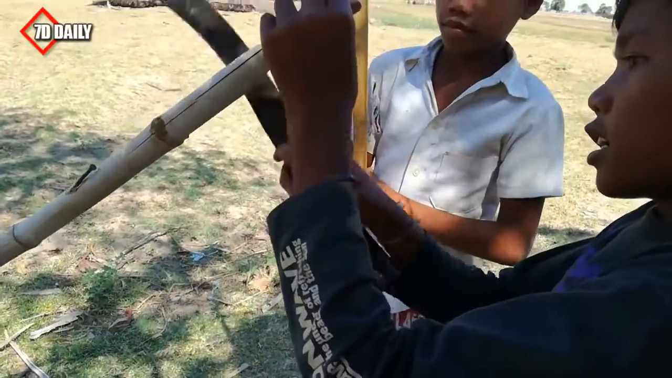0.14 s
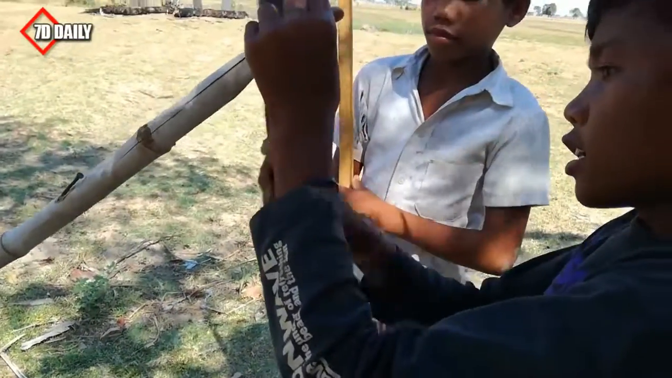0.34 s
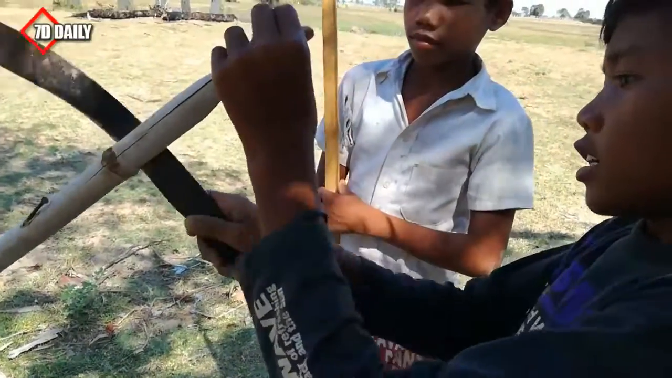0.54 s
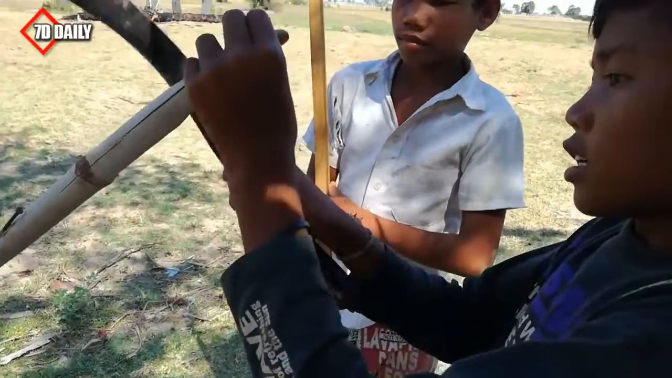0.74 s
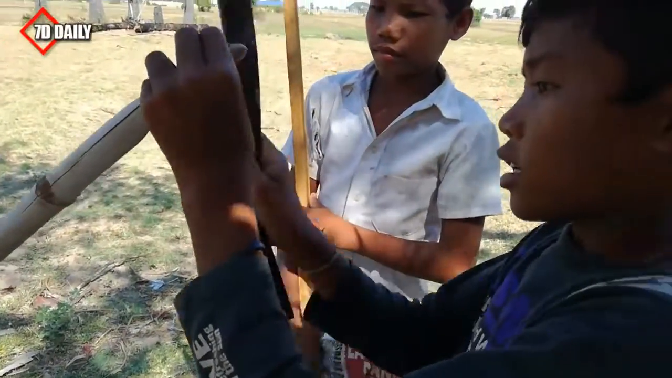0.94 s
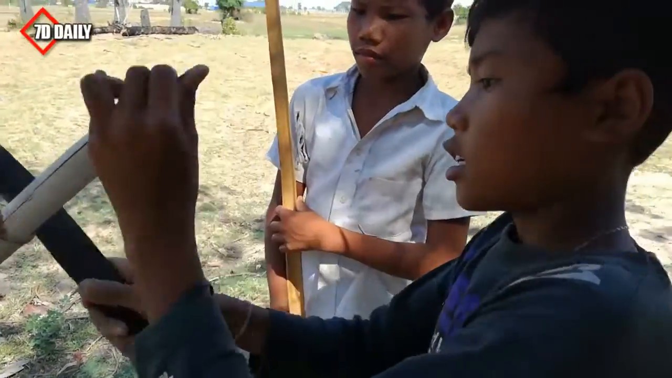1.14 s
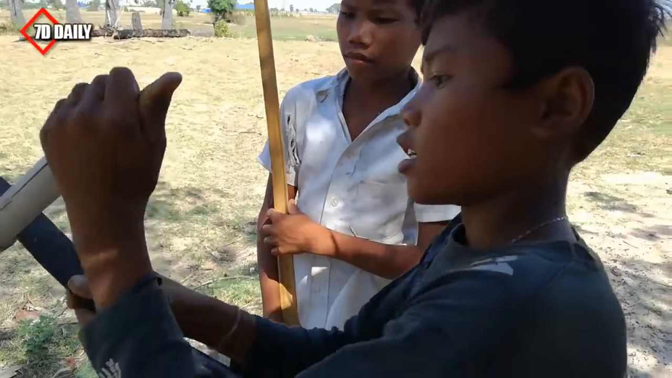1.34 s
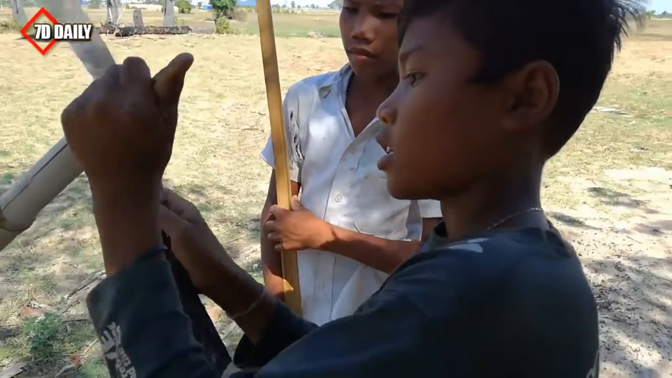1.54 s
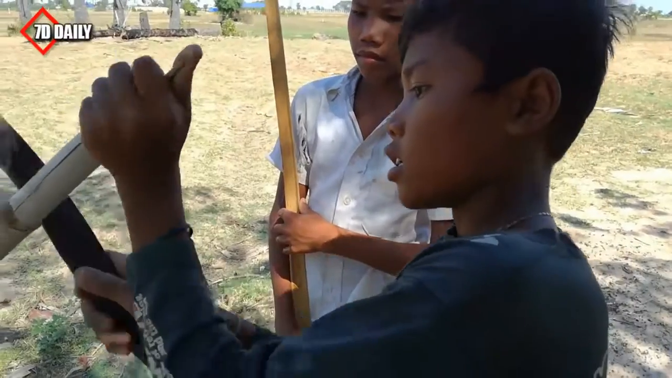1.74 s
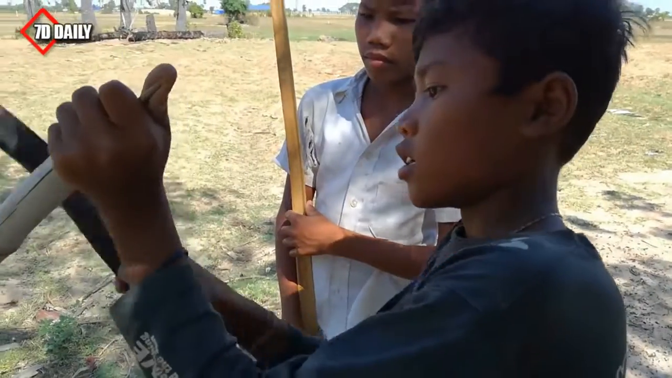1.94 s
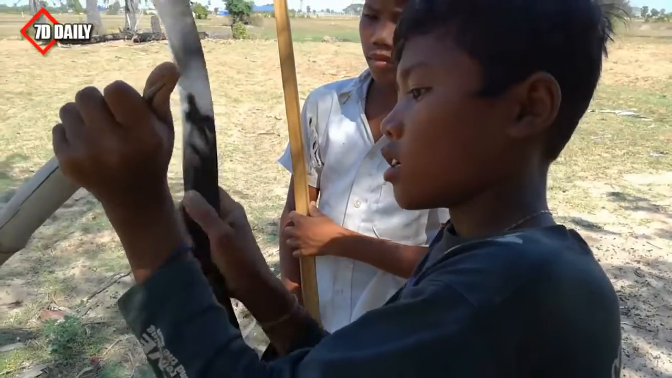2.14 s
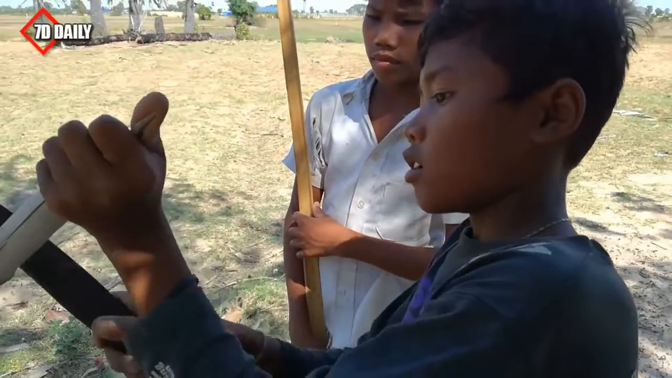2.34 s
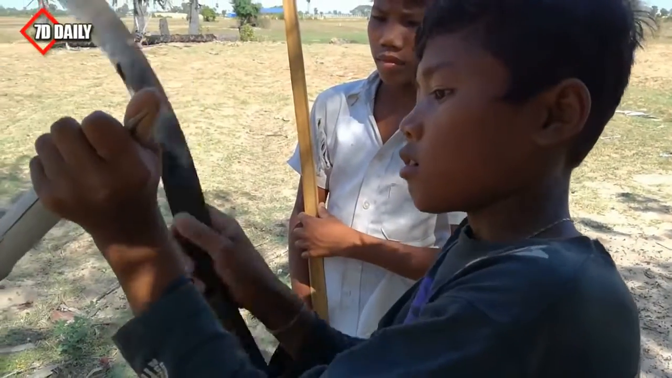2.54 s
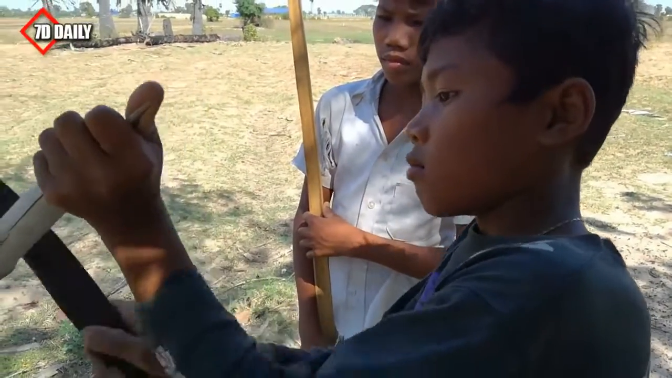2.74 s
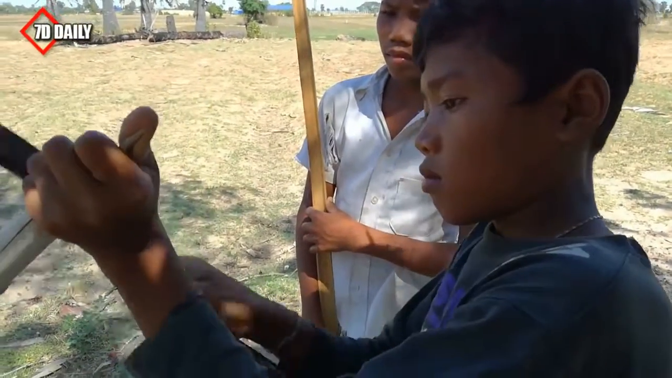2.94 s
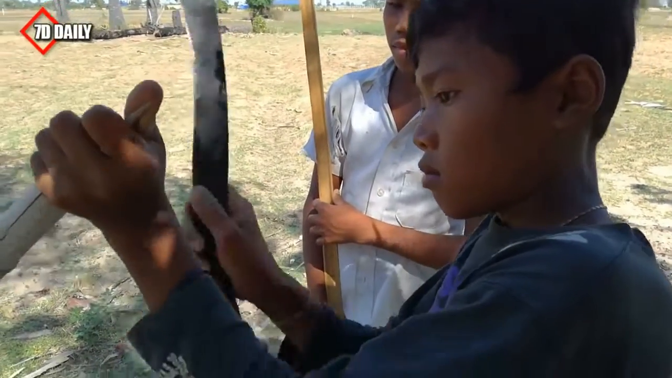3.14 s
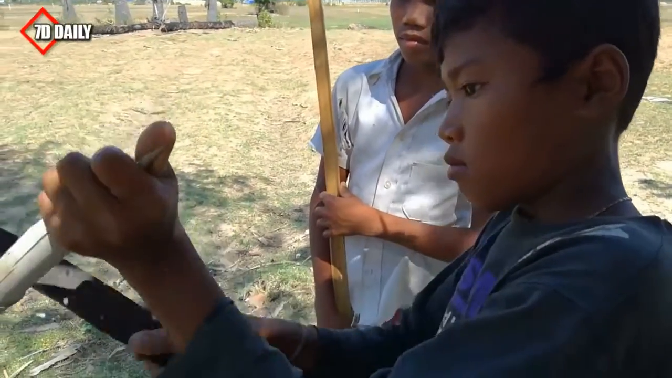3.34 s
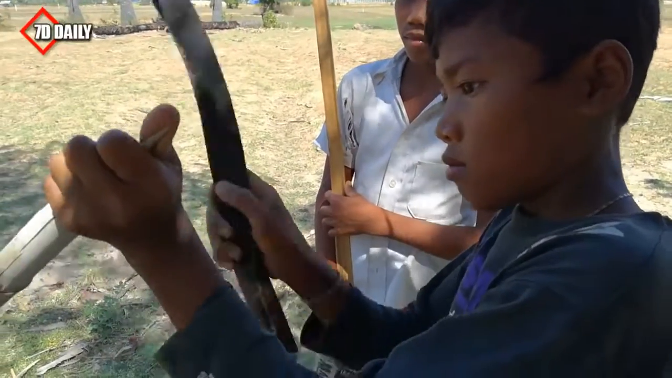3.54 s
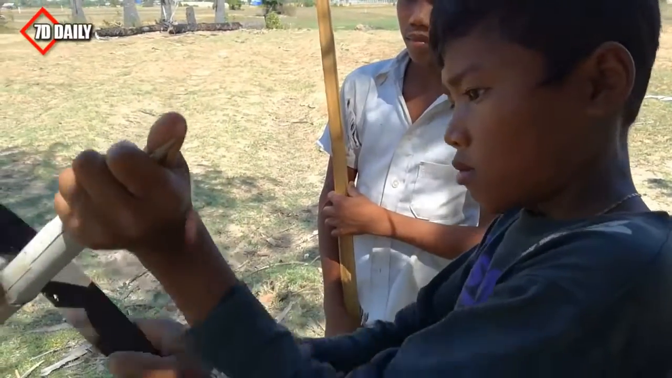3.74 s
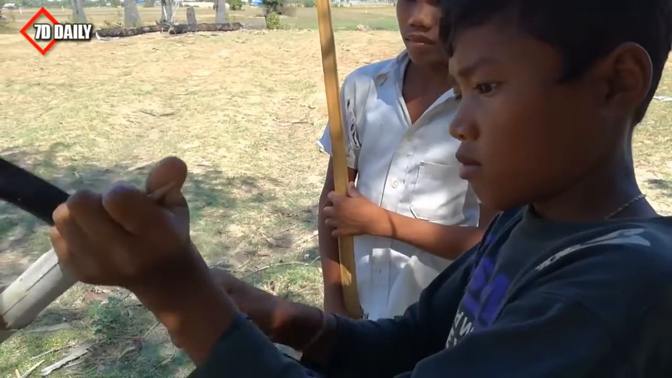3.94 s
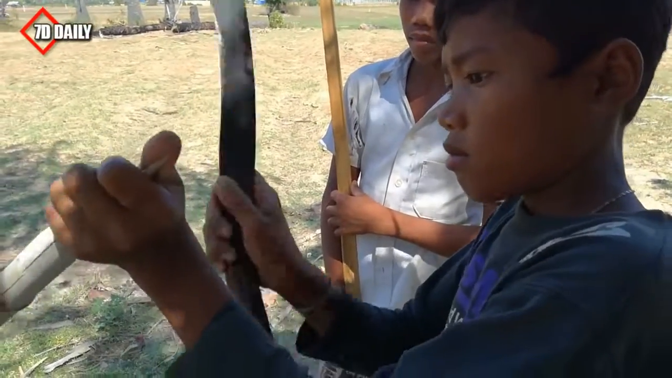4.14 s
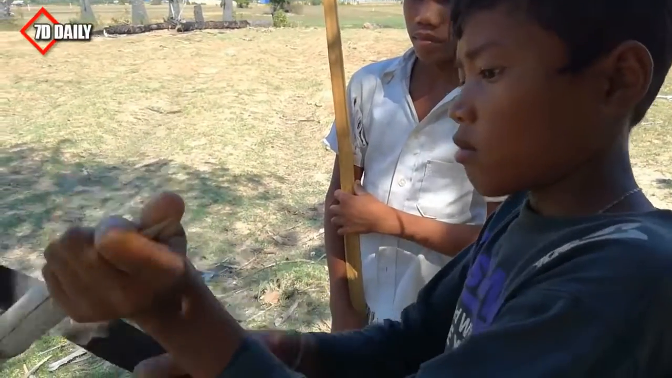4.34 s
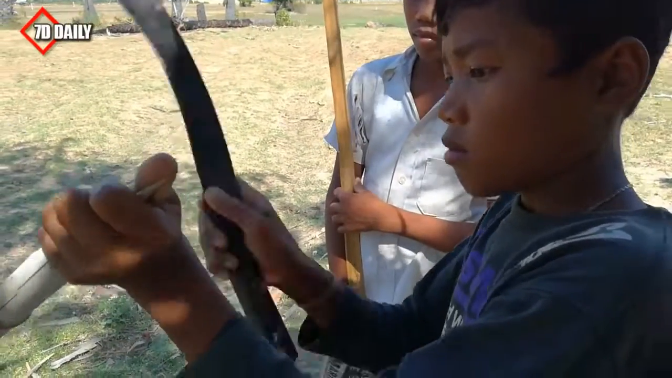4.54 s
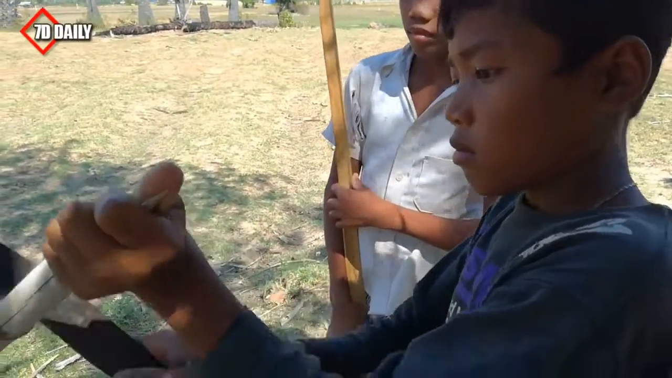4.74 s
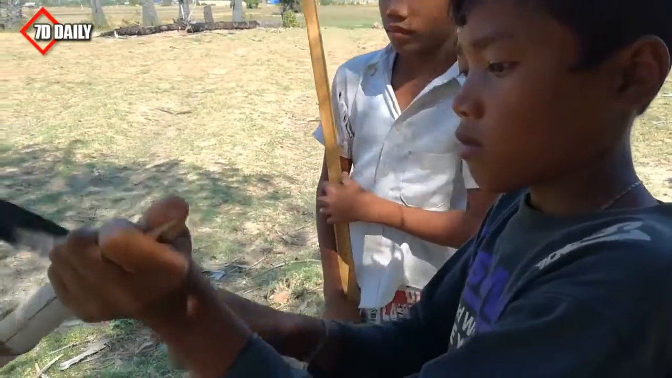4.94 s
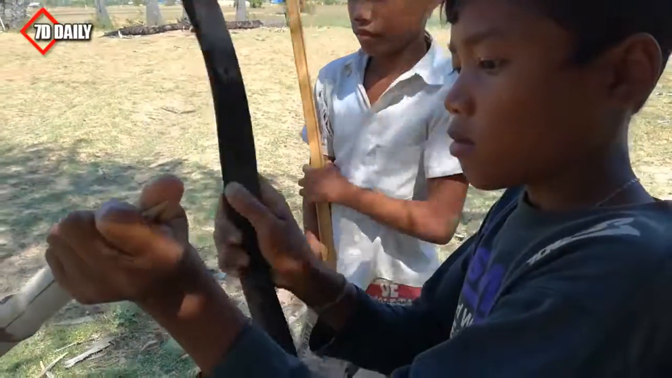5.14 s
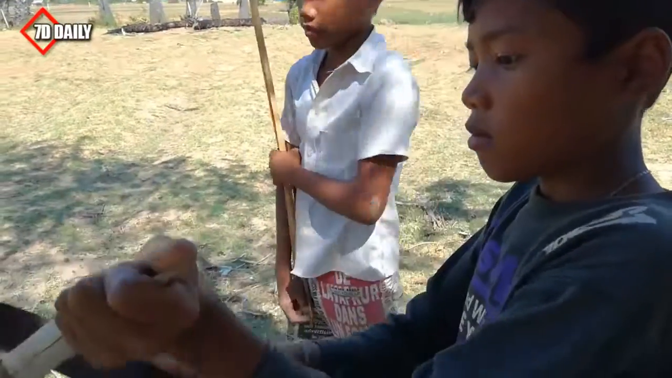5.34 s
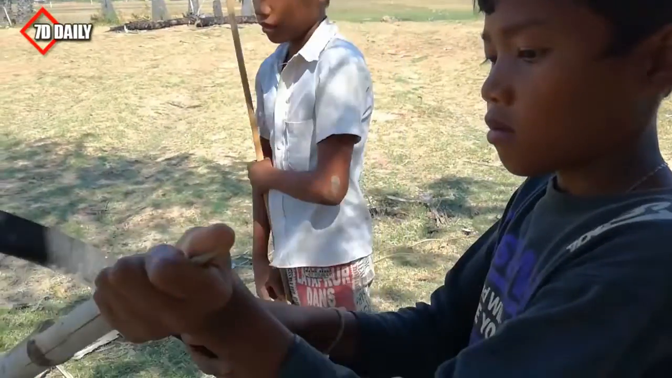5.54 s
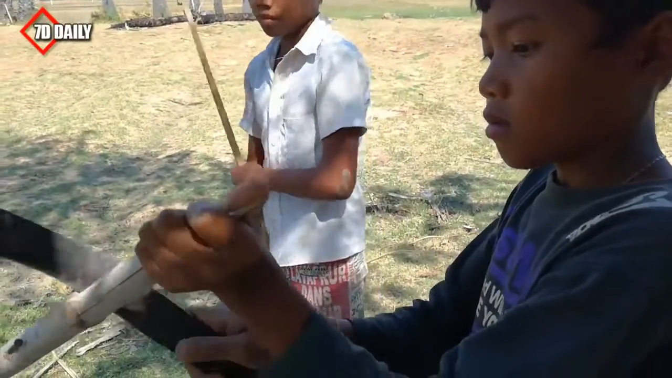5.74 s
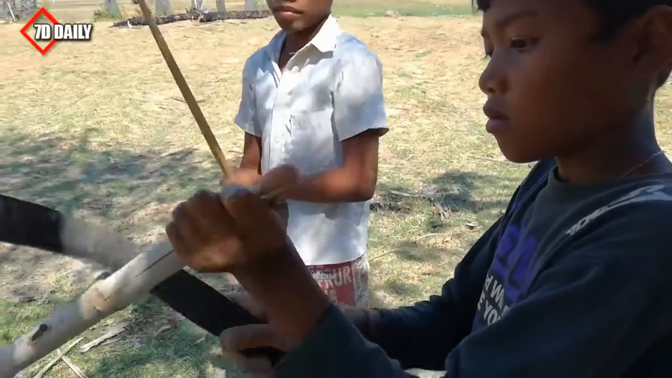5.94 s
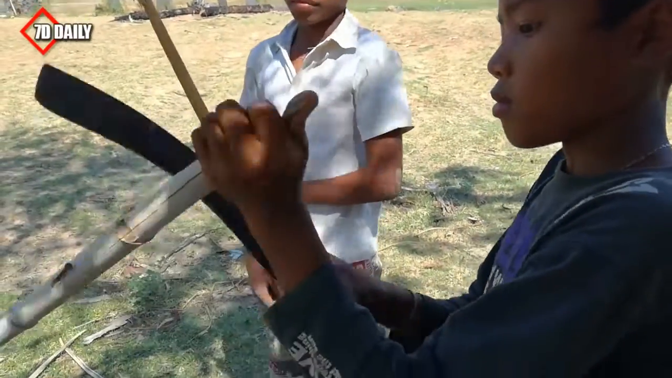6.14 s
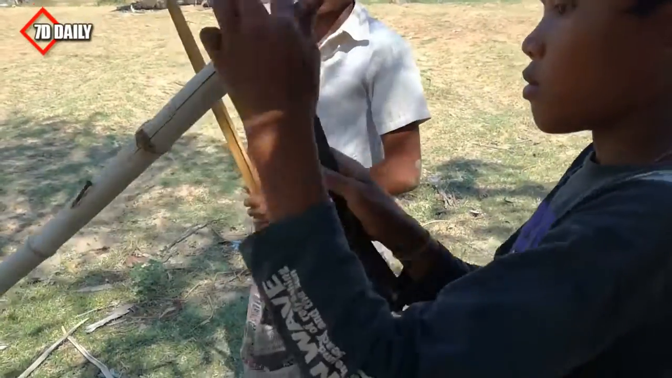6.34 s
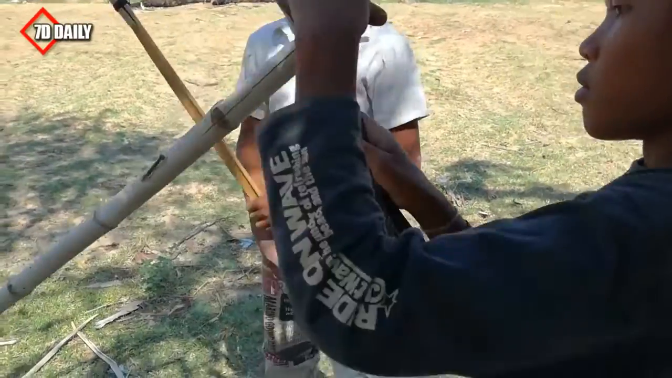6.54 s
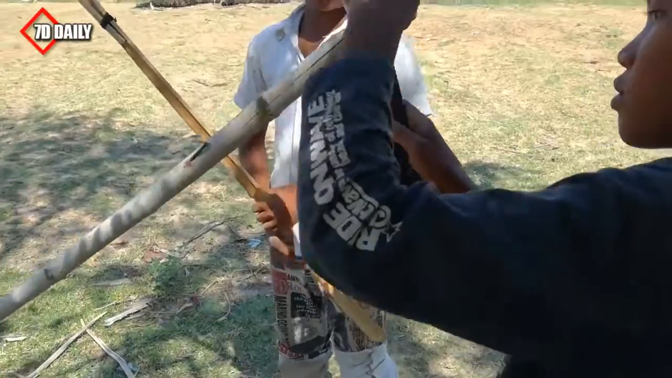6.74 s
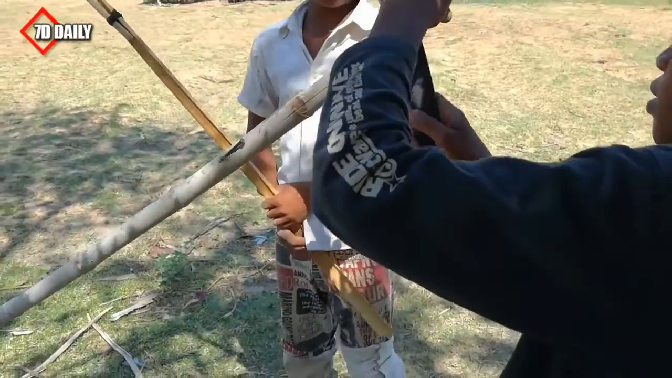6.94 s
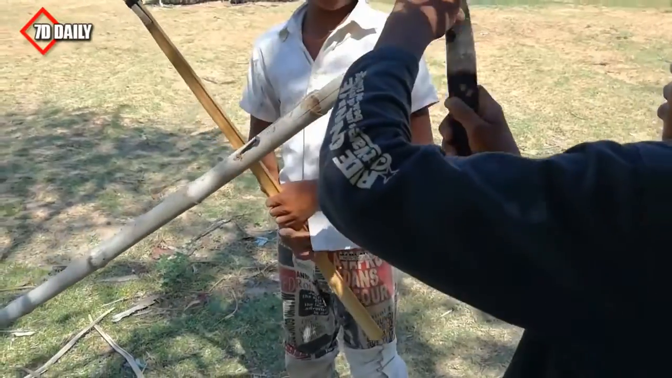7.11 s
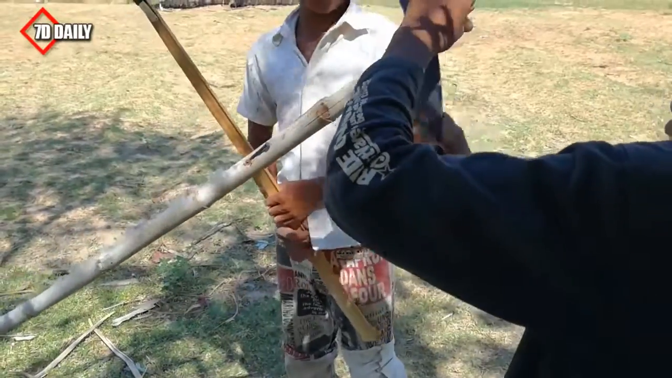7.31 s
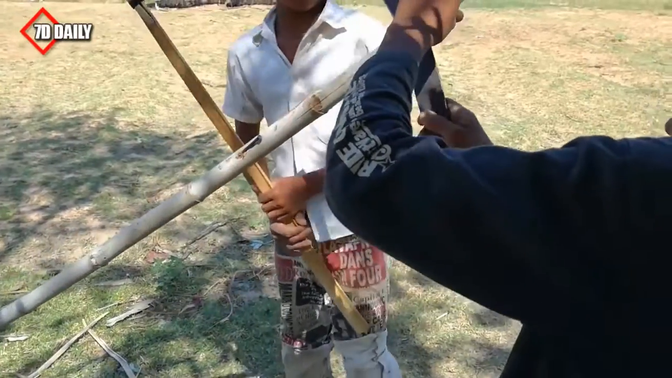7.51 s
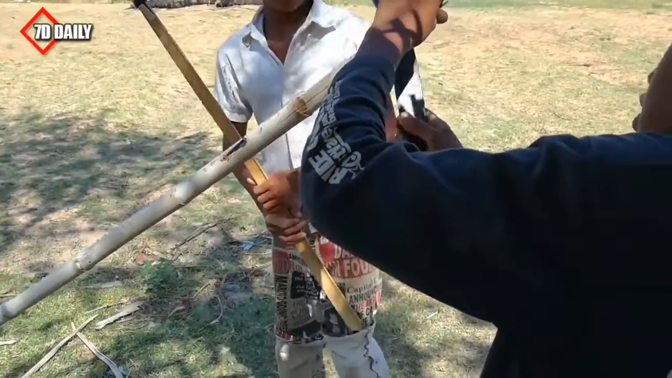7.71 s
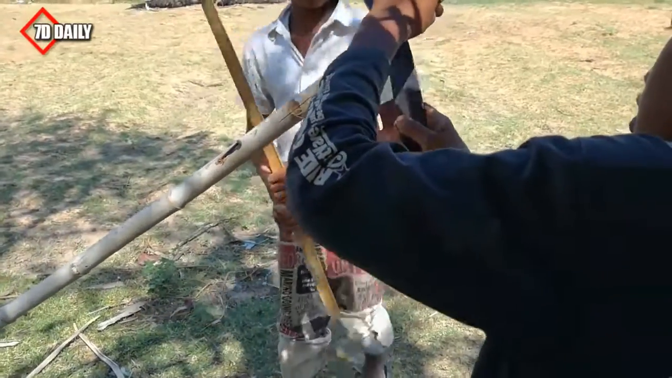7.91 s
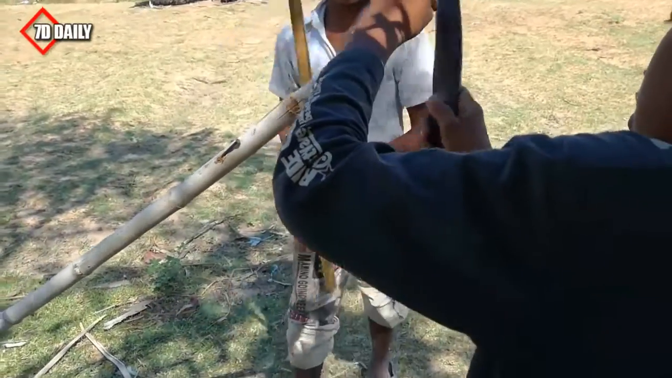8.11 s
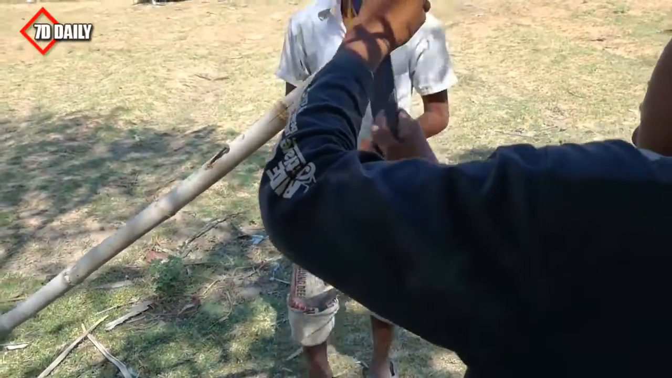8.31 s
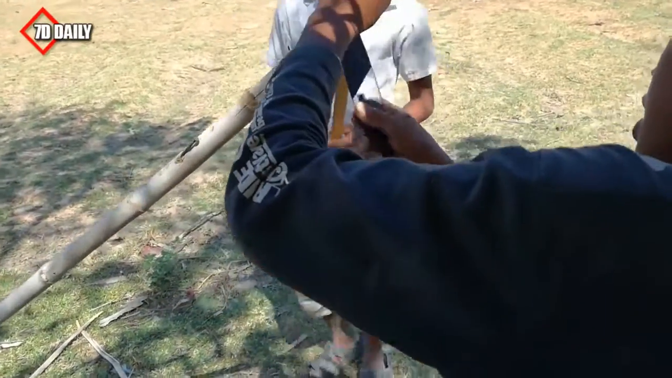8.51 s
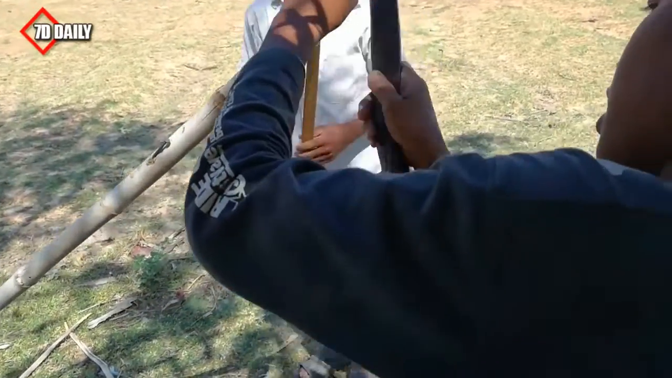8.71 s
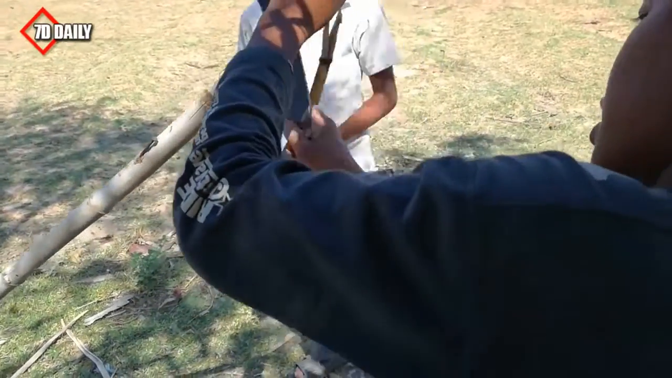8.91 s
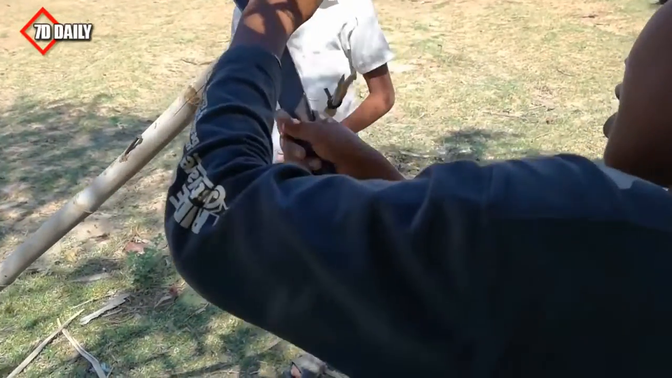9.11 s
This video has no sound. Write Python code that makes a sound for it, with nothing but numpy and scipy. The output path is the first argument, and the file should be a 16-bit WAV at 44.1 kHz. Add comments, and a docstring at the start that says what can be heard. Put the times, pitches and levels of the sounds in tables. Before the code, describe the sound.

Low wind rumble and faint open-air hiss lie under sharp woody snaps of a steel blade on hollow bamboo. The cuts come separately, bright and dry, with short metallic ringing and hardly any echo. Later the edge shaves and rubs the cane, the flat sings briefly, and quiet ticks, scratchy strokes and some lighter cuts follow. Close stereo pickup in an open field, blows mostly to the right, microphone buffeted by gusts.

```python
"""Wind rumbles on the microphone throughout, over a faint hiss of open air; light blade ticks come from 0.1 s.
From 0.4 s to 5.3 s a long steel blade chops at a hand-held bamboo pole, about twice a second: filtered noise
snaps for the fibres, decaying modes for the hollow pole, ringing sines for the steel. Scrapes fall between cuts.
From 5.5 s the edge peels a shaving, then the flat slides and sings through narrow resonances until 6.2 s;
more scrapes and ticks and a few soft cuts follow."""
import sys
import numpy as np
from scipy import signal
from scipy.fft import rfft, irfft, next_fast_len
from scipy.io import wavfile

SR = 44100
rng = np.random.default_rng(int(sys.argv[2]) if len(sys.argv) > 2 else 0)


def int16_out(signal):
    """Quantize to a 16-bit WAV file."""
    q = np.round(np.clip(np.atleast_2d(signal).T, -1, 1) * 32767)
    wavfile.write(sys.argv[1], SR, q.astype(np.int16))


N = 404397
TIME = np.arange(N) / SR
BLOW = np.arange(SR * 6 // 10) / SR   # time within one blow [s]
EARLY = SR * 3 // 100   # the first 30 ms [samples]
CUTOFF_HZ = 16300


def from_db(db):
    """Decibels to gain."""
    return 10 ** (np.asarray(db) / 20)


def rms_one(x):
    """Scale to unit rms."""
    return x / np.sqrt(np.mean(x ** 2) + 1e-20)


def early_one(x):
    """Scale so that the first 30 ms have unit rms."""
    return x / np.sqrt(np.mean(x[..., :EARLY] ** 2) + 1e-20)


def fade(t60):
    """Exponential decay over a blow, 60 dB down after t60 seconds."""
    return np.exp(-np.log(1000) * BLOW / t60)


def at_hz(points, hz, order=1):
    """Read a column of a table on a log-frequency axis."""
    points = np.array(points)
    return np.interp(np.log(np.maximum(hz, 1)), np.log(points[:, 0]), points[:, order])


def gain_curve(rows):
    """Gain in time from (time [s], level [dB]) rows, silent outside them."""
    s, db = np.transpose(rows)
    return from_db(np.interp(TIME, s, db)) * (TIME >= s[0]) * (TIME <= s[-1])


def colour(x, spectrum):
    """Causal (minimum-phase) filter with the given (frequency [Hz], level [dB]) spectrum."""
    size = 2 * next_fast_len(x.shape[-1] // 2 + 2048)
    log_gain = np.log(from_db(at_hz(spectrum, np.fft.rfftfreq(size, 1 / SR))))
    # folding the cepstrum onto positive time gives minimum phase
    cepstrum = irfft(log_gain)
    cepstrum[1:size // 2] *= 2
    cepstrum[size // 2 + 1:] = 0
    response = np.exp(rfft(cepstrum))
    return irfft(rfft(x, size) * response)[..., :x.shape[-1]]


def band(x, low_hz, high_hz):
    """Causal band-pass."""
    sections = signal.butter(3, [low_hz, high_hz], "band", fs=SR, output="sos")
    return signal.sosfilt(sections, x + 1e-18)


def drive(force, response):
    """A force played through an impulse response."""
    played = signal.fftconvolve(np.atleast_2d(force), np.atleast_2d(response), axes=-1)
    return played[:, :force.shape[-1]]


def stereo_noise(alike):
    """White noise with a given left-right correlation."""
    mid, side = rng.standard_normal((2, N))
    alike = np.clip(alike, 0, 1)
    return np.sqrt(1 + alike) * mid + np.sqrt(1 - alike) * side * [[1], [-1]]


def panned(x, db):
    """Left-right level difference."""
    return x * from_db([[db / 2], [-db / 2]])


def add(out, s, sound):
    """Mix a sound in at time s."""
    i = max(round(s * SR), 0)
    out[:, i:i + sound.shape[-1]] += sound[..., :N - i]


def flow():
    """Strength of the wind: the breeze, and gusts that rise, hold and die away, added as powers."""
    # the breeze as rumble on the microphone: (time [s], level [dB])
    breeze = [(0, -63), (1.95, -70), (2.5, -56.5), (3.5, -49), (4.1, -60.5), (4.7, -60), (4.95, -67.5),
              (5.15, -55.5), (5.6, -59), (6.15, -52.5), (7.1, -54), (7.7, -64), (8.1, -54.5), (9.17, -53.5)]
    # gusts on top of it: (start [s], length [s], level [dB])
    gusts = [(0.024, 0.083, -48.5), (0.761, 0.21, -54.5), (1.331, 0.13, -53.5), (1.72, 0.19, -62),
             (2.097, 0.32, -47), (2.698, 0.25, -41.5), (2.957, 0.31, -42.5), (8.191, 0.12, -49),
             (8.948, 0.12, -42.5)]
    attack_s, release_s = 0.015, 0.049   # exponential time constants
    power = from_db(np.interp(TIME, *np.transpose(breeze))) ** 2
    for s, length, db in gusts:
        away = np.maximum((s - TIME) / attack_s, (TIME - s - length) / release_s)
        gust = from_db(db) * np.exp(-np.clip(away, 0, 20))
        power = power + gust ** 2
    return np.sqrt(power)


def wind():
    """Rumble, lumpy eddies and single pressure bumps on the microphone, over the faint hiss of open air."""
    # spectra of the rumble, the eddies and the air: (frequency [Hz], relative level [dB])
    rumble_colour = [(11, -27.5), (18, -2), (70, 3), (200, -22), (260, -46), (440, -120)]
    eddy_colour = [(90, -13.5), (140, 0.5), (210, -1.5), (300, -11), (450, -30.5), (800, -39), (2000, -67)]
    air_colour = [(180, -30.5), (300, -8), (603, -10.5), (645, -18), (737, -12), (1060, -11.5),
                  (1150, -12.5), (1390, -13.5), (2570, -13.5), (16000, -34.5)]
    # single buffets on the microphone: (time [s], peak level [dB], width [s])
    buffets = [(2.102, -30.5, 0.0012), (2.307, -31, 0.0019), (2.813, -31.5, 0.0019),
               (2.891, -25.5, 0.00091), (2.903, -31, 0.0018), (2.925, -27.5, 0.0012), (2.934, -31, 0.0015),
               (9.032, -31, 0.0031)]
    air_db = -75.5
    # eddies grow faster than the rumble: their level at a stiff wind, growth [dB per dB], rest in a lull
    stiff_wind_db, eddy_db, eddy_growth, lull_eddy_db = -42.5, -53.5, 1.6, -73

    strength = flow()
    grown = from_db(eddy_db) * (strength / from_db(stiff_wind_db)) ** eddy_growth
    eddies = np.hypot(grown, from_db(lull_eddy_db))
    wander = np.interp(TIME * 30, np.arange(N), rng.standard_normal(N))   # 30 random levels a second
    lumps = rms_one(from_db(2.0 * wander))
    out = strength * rms_one(colour(stereo_noise(alike=.96), rumble_colour))
    out += eddies * lumps * rms_one(colour(stereo_noise(alike=0.55), eddy_colour))
    for s, db, width in buffets:
        u = (TIME[:EARLY * 2] - TIME[EARLY]) / width
        bump = (u * u - 1) * np.exp(-u * u / 2)
        add(out, s - TIME[EARLY], from_db(db) * bump)
    return out + from_db(air_db) * rms_one(colour(stereo_noise(alike=.4), air_colour))


def splitting(seconds, snaps_per_s, snap_size):
    """The edge lands, then fibres snap in a quickly fading run; they are too small to carry bass."""
    size, chance = rng.standard_normal(len(BLOW)), rng.random(len(BLOW))
    snaps = snap_size * size * (chance < snaps_per_s / SR) * np.exp(-BLOW / seconds)
    force = colour(snaps, [(300, -13.5), (1000, -2.5), (2500, 0)])
    force[0] -= 1   # the landing
    return force


def ringing(modes, spread_db, detune):
    """Decaying sines of alternating sign; strength and pitch vary from blow to blow, most for short waves."""
    hz, db, t60 = np.transpose(modes)[:, :, None]
    variation = np.minimum(np.sqrt(hz / 1500), 1.5)
    strength, shift = rng.standard_normal((2, len(modes), 1)) * variation
    signs = (-1) ** np.arange(len(modes))[:, None]
    waves = np.sin(2 * np.pi * hz * (1 + detune * shift) * BLOW) * signs
    return (from_db(db + spread_db * strength) * waves * fade(t60)).sum(0)


def wall_modes():
    """Countless weak modes as bands of fading noise, different at each port; the highest die first."""
    # decay of the crowded modes: (frequency [Hz], t60 [s])
    wall_t60 = [(200, 0.14), (600, 0.068), (1500, 0.093), (4000, .065), (12000, 0.044)]
    edges = np.geomspace(150, CUTOFF_HZ, 8)
    out = 0
    for low, high in zip(edges, edges[1:]):
        t60 = at_hz(wall_t60, np.sqrt(low * high))
        out = out + band(rng.standard_normal((2, len(BLOW))), low, high) * fade(t60)
    spectrum = [(200, -11.5), (600, 0.5), (1500, -3.5), (3400, -0.5), (6500, -5.5), (9500, -15.5), (15000, -24.5)]
    return early_one(colour(out, spectrum))


def cane(force, pole_db, wall_db):
    """One force makes the contact sound and excites the pole's main modes and its crowded wall modes."""
    # the sharp contact sound: (frequency [Hz], relative level [dB])
    contact_colour = [(100, -5.5), (250, 2.5), (700, -4), (1800, 1.5), (2600, -2.5), (3400, 6.5),
                      (5000, -2.5), (7000, -8.5), (9500, -21.5), (15000, -21)]
    # main modes of the pole: (frequency [Hz], relative level [dB], t60 [s])
    pole_modes = [(260, -12, 0.055), (270, -7, 0.018), (521, 0.5, 0.038), (618, -5, 0.087),
                  (820, -16.5, 0.014), (883, -0.5, 0.027), (977, -3, 0.061), (1062, -5, 0.077),
                  (1190, -7, 0.12), (1320, -6.5, 0.041), (1571, -5.5, .07), (1660, -8, 0.038),
                  (1965, -4, 0.11), (2060, -7.5, 0.065), (2290, -9, 0.072), (2660, -7.5, 0.037),
                  (2960, -4, 0.044), (3182, 4.5, 0.028), (3700, -3, 0.026), (3780, -4.5, .035),
                  (4300, -3, .035), (5170, -2.5, 0.024), (5300, -6, 0.024), (6610, -2.5, .025),
                  (7740, -7, 0.015), (9140, -15.5, 0.0049), (10020, -17.5, 0.0084), (14000, -16, 0.026)]
    contact = early_one(colour(force, contact_colour))
    pole = early_one(drive(force, ringing(pole_modes, spread_db=3.0, detune=.014)))
    wall = early_one(drive(force, wall_modes()))
    return contact + from_db(pole_db) * pole + from_db(wall_db) * wall


def ticks():
    """Light touches of the edge are too weak to move the pole's low modes much."""
    # touches: (time [s], level [dB], fading time of the snaps [s], left-right difference [dB])
    touches = [(0.0995, -64.5, 0.0013, 2), (0.5006, -65, 0.0013, -8), (0.7851, -75, 0.0029, 2),
               (1.337, -51.5, 0.0018, 2), (1.4047, -72.5, 0.0036, 6), (3.4058, -50.5, 0.0013, 1),
               (4.4184, -61.5, 0.00083, 2), (5.5392, -56, 0.0012, 0), (5.832, -71, 0.001, 0),
               (5.8722, -75, 0.00045, -1), (6.402, -63.5, 0.0022, -6), (6.598, -82, .001, -6),
               (6.678, -79, .002, -2), (7.5980, -68, 0.0015, -3), (7.659, -71, .002, -8),
               (8.0653, -55.5, 0.00033, -0.5), (8.578, -70, 0.0015, -9)]
    tone = [(300, 1), (1100, 7.2), (4000, 7.8), (12000, 5.6)]
    out = np.zeros((2, N))
    for s, db, seconds, pan_db in touches:
        force = splitting(seconds, snaps_per_s=1800, snap_size=1.4)
        sound = cane(force, pole_db=-15.0, wall_db=7.5)
        add(out, s, from_db(db) * panned(early_one(colour(sound, tone)), pan_db))
    return out


def blade(first_db, t60, overtones_db):
    """The steel rings on, damped by the grip of the cut; a faint, slower remainder lingers."""
    # overtones: (frequency [Hz], relative level [dB], t60 [s])
    overtones = [(1545, 5, .22), (2495, -9, .14), (3640, -21, .1), (4270, -17, .11), (5464, -24, .1),
                 (7680, -30, .09)]
    first_hz = 1140
    decay = fade(t60) + from_db(-31) * fade(0.35)
    first = np.sin(2 * np.pi * first_hz * BLOW) * decay
    return from_db(first_db) * first + from_db(overtones_db) * ringing(overtones, spread_db=1.5, detune=.0005)


def ports(x, right):
    """The further right the blow, the more the left port's delay and level depart from the right port's."""
    # the two microphone ports, for a blow fully right: (frequency [Hz], left lag [ms], left-right level [dB])
    port_paths = [(121, .05, 0), (324, 0.74, 0.5), (566, .62, -6), (880, 0.31, -4), (1080, 0.15, -3),
                  (2500, 0.26, 0), (3550, .23, -2), (6050, .23, -11.5), (12000, .23, -0.5)]
    size = next_fast_len(x.shape[-1] + SR // 10)
    hz = np.fft.rfftfreq(size, 1 / SR)
    lag = right * at_hz(port_paths, hz) / 1000
    balance = from_db(right * at_hz(port_paths, hz, order=2))
    left = balance * np.exp(-2j * np.pi * hz * lag)
    even_power = np.sqrt(2 / (1 + balance ** 2))
    paths = np.array([left, np.ones(len(hz))]) * even_power
    return irfft(rfft(x, size) * paths, size)[:, :x.shape[-1]]


def cuts():
    """Level, brightness and depth share each cut's energy among five registers; the steel rings on."""
    # cuts: (time [s], level [dB], brightness [dB per octave], depth [dB],
    #        blade's first mode [dB], its t60 [s], blade's overtones [dB])
    chops = [(0.387, -39, 3.5, -3, -42.5, 0.14, -71), (0.4015, -32, -1, -7, -41, 0.23, -63),
             (1.0612, -35.5, 7.5, -0.5, -43.5, .2, -60.5), (1.7403, -37, -4, 5, -42.5, 0.59, -53.5),
             (2.2373, -36.5, .5, 5, -47.5, 0.54, -57), (2.7222, -34, -.5, 1.5, -38.5, .07, -38),
             (2.7252, -34, -3, 1.5, -59.5, .07, -57), (3.21, -31.5, 1.35, 3, -28, .13, -48.5),
             (3.2133, -39, 1.5, -2, -63.5, .1, -66.5), (3.7055, -31.5, 1, 5.5, -36, 0.19, -54),
             (4.2218, -30.5, -1.5, 2.5, -45.5, 0.39, -40), (4.2324, -36, 0.5, -4, -27.5, 0.2, -51),
             (4.7338, -33, -0.2, 1, -43.5, 0.36, -62.5), (5.2632, -32, -0.5, 5, -34.5, .19, -36.5),
             (5.283, -49.5, -7.5, 2, -64, .1, -68.5), (5.767, -58.5, -6.5, 12.5, -54, 0.21, -69),
             (7.273, -59, -2.5, 0, -59, 0.23, -91), (8.2382, -38.5, 0.9, -20.5, -45, 0.21, -63),
             (8.8392, -43, -3, -15, -44, 0.13, -75), (8.849, -53, 9.5, -1, -72, 0.081, -69)]
    # five registers, low to high: (level re the cut [dB], gain per depth [dB per dB])
    # a deep cut knocks the hollow pole; a shallow one bites at about 2 kHz instead
    registers = [(-0.12, 1.03), (2.5, 0.01), (-1.5, -0.31), (1, .05), (-8.5, 0.21)]
    # borders of the registers: (frequency [Hz])
    edges = [110, 700, 1400, 2800, 6000, 17000]
    # where the blade works: (time [s], position [0 ahead to 1 right])
    place = [(.4, 0.88), (1.7, 1), (5.3, 0.95), (7.2, 0.53), (8.85, 0.48)]
    brightness_pivot_hz, brightness_from_hz = 3000, 600
    # a firm cut splits the fibres in split_s; weaker ones take longer (dB of time per dB of level)
    firm_db, split_s, split_slowing = -34, 0.0023, 0.19

    out = np.zeros((2, N))
    centres = np.sqrt(np.multiply(edges[:-1], edges[1:]))
    octaves = np.log2(centres / brightness_pivot_hz) * (centres > brightness_from_hz)
    usual_db, per_depth = np.transpose(registers)
    for s, db, brightness, depth_db, first_db, t60, overtones_db in chops:
        seconds = split_s * from_db(split_slowing * (firm_db - db))
        force = splitting(seconds, snaps_per_s=2500, snap_size=0.86)
        sound = cane(force, pole_db=2.5, wall_db=0.5)
        # the registers are balanced by one smooth filter, so the crack stays sharp
        wanted_db = db + usual_db + brightness * octaves + depth_db * per_depth
        powers = [np.mean(band(sound, low, high)[:, :EARLY] ** 2) for low, high in zip(edges, edges[1:])]
        now_db = 10 * np.log10(powers)
        wood = colour(sound, np.column_stack([centres, wanted_db - now_db]))
        right = np.interp(s, *np.transpose(place))
        add(out, s, ports(wood + blade(first_db, t60, overtones_db), right))
    return out


def outdoors(x, t60, scatter_db):
    """A weak, dull noise tail scattered by the surroundings."""
    # spectrum of the scatter: (frequency [Hz], relative level [dB])
    scatter_colour = [(150, -9), (600, -4), (1200, 0), (3300, -4.5), (6000, -8), (14000, -10)]
    build_up = 1 - np.exp(-BLOW / 0.005)
    tail = rng.standard_normal((2, len(BLOW))) * fade(t60) * build_up
    tail = rms_one(tail) / np.sqrt(len(BLOW))   # unit energy
    return x + from_db(scatter_db) * drive(x, colour(tail, scatter_colour))


def slips(grain_db, catch_db, catches_per_s):
    """Dense tiny slips of steel on cane, clumped where the edge catches on the grain."""
    sizes = from_db(grain_db * np.minimum(rng.exponential(1, N), 6))
    catches = np.interp(TIME * catches_per_s, np.arange(N), rng.standard_normal(N))
    return stereo_noise(alike=0.1) * sizes * from_db(catch_db * catches)


def strokes():
    """Pressure on the blade builds and eases again with each stroke."""
    # strokes along the cane: (time of greatest pressure [s], level [dB], rise [s], fall [s])
    rubs = [(0.501, -71, 0.065, 0.12), (1.16, -72.5, 0.075, .03), (1.4, -71.5, .05, 0.027),
            (1.53, -60.5, 0.042, 0.019), (5.19, -75.5, .15, .05), (5.42, -69.5, 0.12, 0.31),
            (6.295, -68.5, 0.07, 0.043), (6.415, -59.5, .03, 0.038), (6.51, -69.5, .025, 0.2),
            (7.646, -57, 0.096, 0.08), (7.88, -79, 0.068, 0.13), (8.05, -63, 0.15, 0.11),
            (8.61, -67, 0.26, 0.18), (8.915, -53.5, 0.049, 0.054)]
    swell_db = 12.5   # gained over each rise, lost over each fall
    pressure = 0
    for s, db, rise, fall in rubs:
        away = np.minimum(np.maximum((s - TIME) / rise, (TIME - s) / fall), 10)
        pressure = pressure + from_db(db - swell_db * away)
    return pressure


def singing(grit):
    """Sliding friction feeds the narrow resonances of the steel, which join in over time."""
    # the flat of the blade sliding: (time [s], level [dB])
    slide = [(5.9, -60), (5.985, -49.5), (6.05, -60), (6.125, -52.5), (6.18, -64), (6.24, -84)]
    # resonances: (frequency [Hz], width [Hz], relative level [dB], joins in at [s])
    resonances = [(1137, 48, -11, 5.9), (1542, 44, -21, 5.95), (2490, 59, -9, 6.03),
                  (3580, 2300, -12.5, 5.9), (5000, 590, -12.5, 5.9), (5470, 51, -6, 5.9),
                  (7600, 570, -15, 5.93), (10640, 220, -26.5, 5.95), (13550, 380, -38, 5.9)]
    out = 0
    for hz, width, db, joins in resonances:
        peak = signal.iirpeak(hz, hz / width, fs=SR)
        tone = rms_one(signal.lfilter(*peak, signal.lfilter(*peak, grit)))
        fade_in = np.clip((TIME - joins) / 0.072, 0, 1)
        out = out + from_db(db) * tone * fade_in
    return out * gain_curve(slide)


def rubbing():
    """The blade rubs, peels a shaving and slides on its flat and sings; fibres crackle in the rub and peel."""
    # spectra of the rub and of the peeling rasp: (frequency [Hz], relative level [dB])
    rub_colour = [(300, -31), (600, -8.5), (1200, 1), (2000, -2), (3500, -4.5), (5300, -6), (8000, -16.5),
                  (11000, -24), (16000, -36.5)]
    peel_colour = [(290, -45), (500, -23), (688, -23), (750, -26), (795, -21), (1180, -12.5), (1740, -16),
                   (2500, -5), (3020, -8), (3810, -2), (4730, -14.5), (6700, -18.5), (16000, -36)]
    # the edge peeling a shaving: (time [s], level [dB])
    peeling = [(5.53, -72), (5.55, -61), (5.58, -61.5), (5.62, -64.5), (5.66, -62.5), (5.76, -62.5),
               (5.82, -69)]
    fibres_db = -7.5   # snapping fibres, re the grit
    grit = rms_one(slips(grain_db=0.0, catch_db=1.0, catches_per_s=88))
    fibres = rng.standard_normal(N) * (rng.random(N) < 120 / SR)   # about 120 snaps a second
    rough = grit + from_db(fibres_db) * rms_one(fibres)
    rub = rms_one(colour(rough, rub_colour)) * strokes()
    peel = rms_one(colour(rough, peel_colour)) * gain_curve(peeling)
    return rub + panned(peel, db=-3.0) + singing(grit)


def scene():
    """Wind, touches and cuts in the open air, and scrapes."""
    return wind() + outdoors(ticks() + cuts(), t60=.3, scatter_db=-20) + rubbing()


def record(dry):
    """The top is cut steeply."""
    low_pass = signal.ellip(10, .1, 80, CUTOFF_HZ, fs=SR, output="sos")
    return signal.sosfilt(low_pass, dry)


dry = scene()
out = record(dry)
int16_out(out)
```